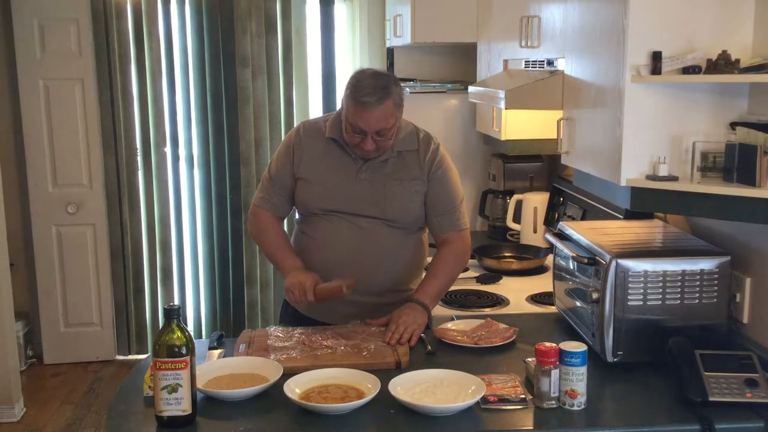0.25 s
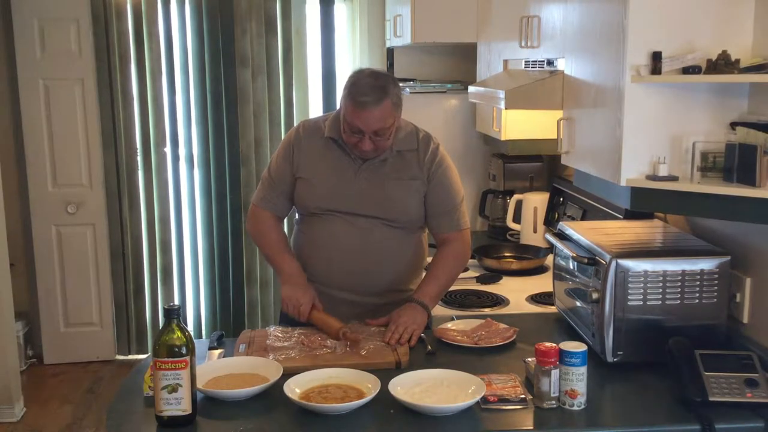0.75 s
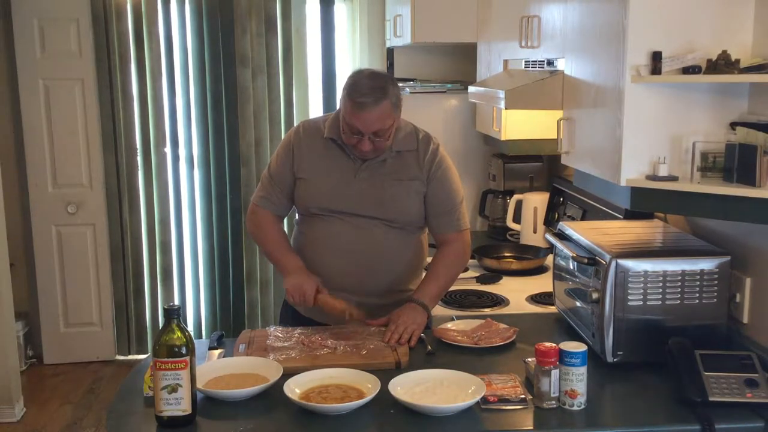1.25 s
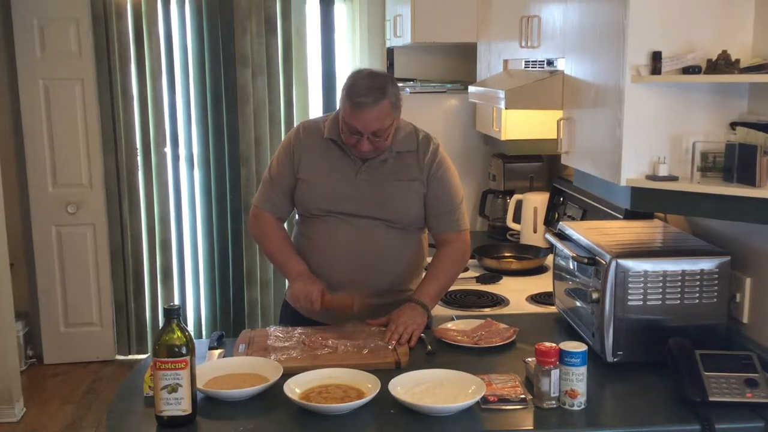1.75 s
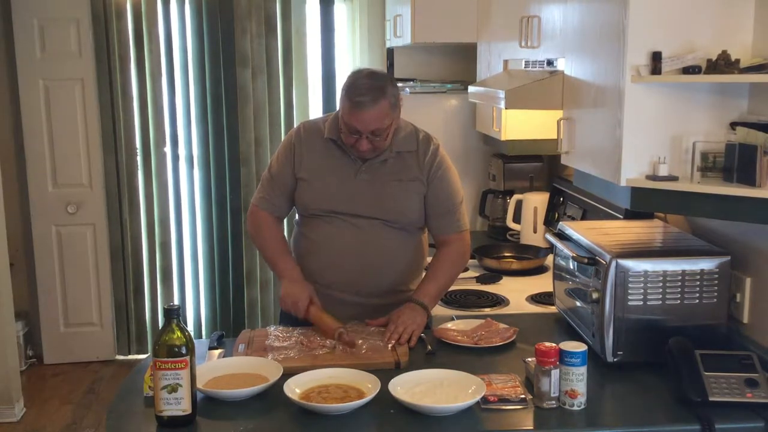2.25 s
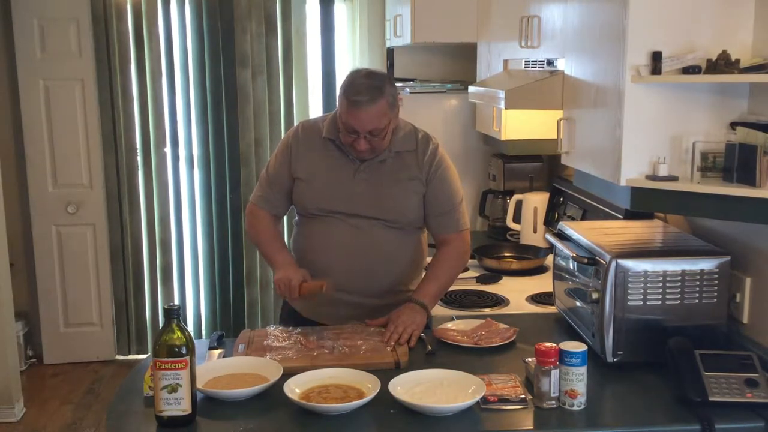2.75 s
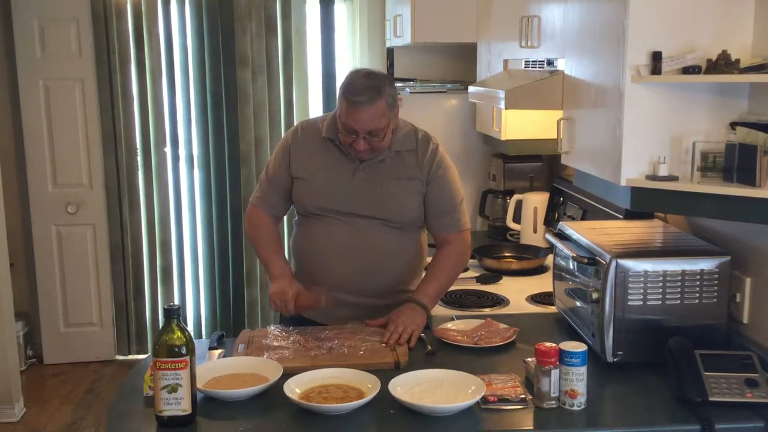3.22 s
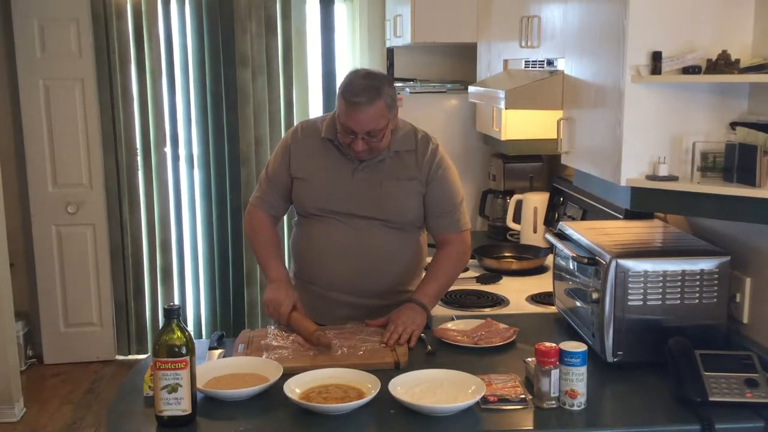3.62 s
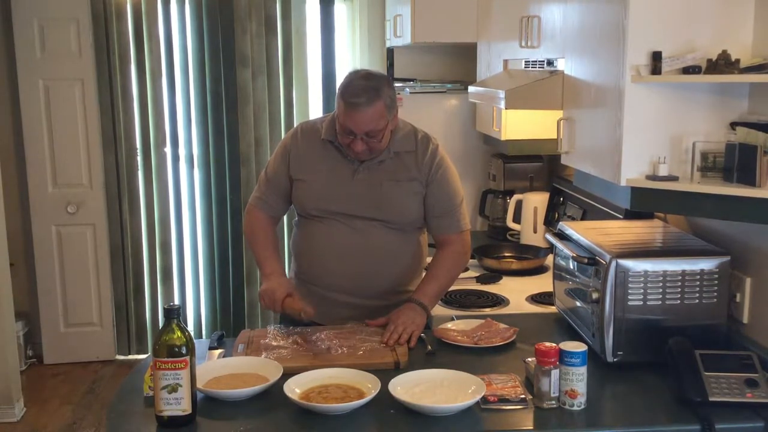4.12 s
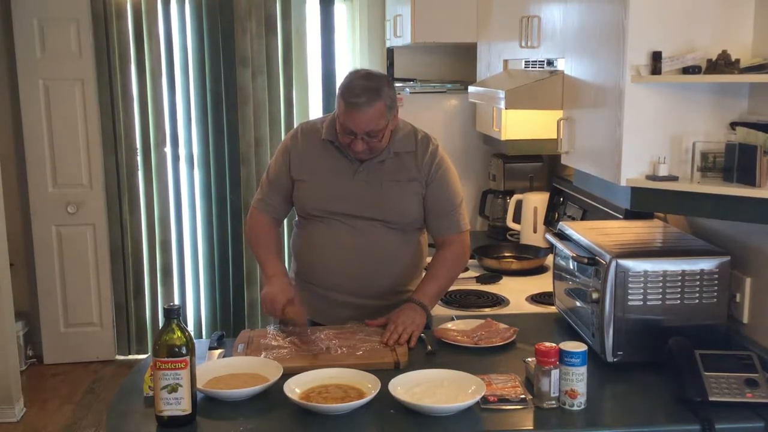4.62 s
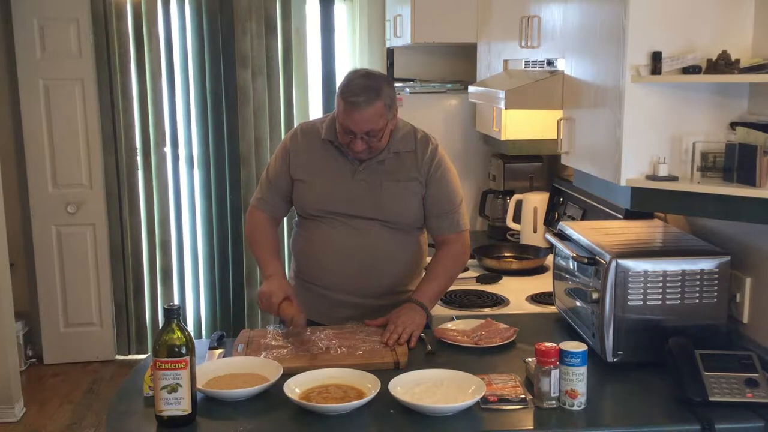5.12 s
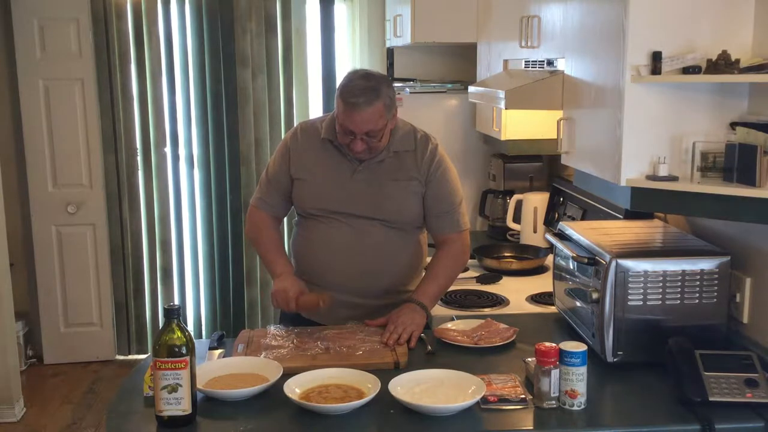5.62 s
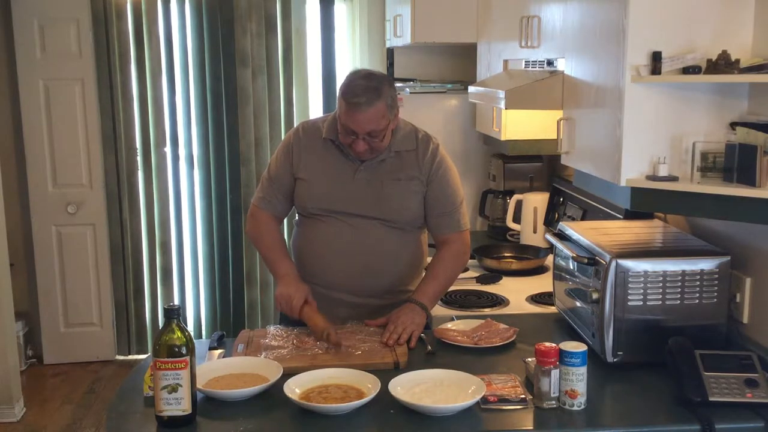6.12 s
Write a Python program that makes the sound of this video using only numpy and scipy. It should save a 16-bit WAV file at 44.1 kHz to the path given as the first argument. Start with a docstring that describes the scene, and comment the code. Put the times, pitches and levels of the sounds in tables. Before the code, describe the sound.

A wooden pin steadily beats film-covered chicken on a board, each wet slap landing with a woody knock and low counter thump, in a small kitchen.

```python
"""Wet slaps and wooden knocks, about three a second: a rolling pin beats filmed chicken on a board.
Each stroke smacks the film (swelling click noise), pops trapped air, squelches, then rustles (noise).
It thumps the counter (decaying sines with echoes); pin and board knock (noise bursts in resonances).
Force and flatness set most levels, random spectral patches the colour of film and wood.
Bowls ring faintly (wavering sines); a small hard kitchen adds diffuse tails and a steady hush."""
import sys
import numpy as np
from scipy import signal
from scipy.fft import rfft, irfft, next_fast_len
from scipy.io import wavfile
from scipy.ndimage import map_coordinates

SR = 44100
rng = np.random.default_rng(int(sys.argv[2]) if len(sys.argv) > 2 else 0)


def materialize(psi):
    """Save the field psi as 16-bit PCM at rate SR to the path in sys.argv[1].

    A 1-D psi becomes a single channel; in a 2-D psi each row is a channel.
    """
    bounded = np.clip(np.atleast_2d(psi).T, -1, 1)
    quanta = np.round(bounded * 32767).astype(np.int16)
    wavfile.write(sys.argv[1], SR, quanta)


N = 280917

# strokes of the pin: slap_s, squash_s (slap to knock), force_db, flatness_db, crack_db (over the knock)
STROKES = [(-0.16, 0.0061, 0, 1, -3), (0.189, 0.0051, 0.5, 4, -10), (0.534, 0.0097, 1.5, -0.5, -3),
           (0.906, 0.0082, -2, 1, -23), (1.253, 0.0042, 0.5, 3.5, -12.5), (1.596, 0.0064, -0.5, 1, -14.5),
           (1.951, 0.0053, -2.5, 1.5, -8), (2.306, 0.001787, -2.5, 5.5, -16),
           (2.677, 0.0095, -0.5, -2.5, -3), (3.056, 0.0083, -4, 2, -23), (3.426, 0.012, -6, -.5, -11),
           (3.775, .024, -10.5, -1, -9), (4.132, .0054, .5, -9, -3), (4.474, 0.027, -10, -3.5, -7),
           (4.812, 0.02, -8, -8, -14), (5.176, 0.0067, -1.5, -6, -42), (5.503, 0.011, -3, -2, -4),
           (5.836, 0.005, -7.5, 2.5, -17), (6.186, .0098, -1.5, 1, -5)]
# low modes of counter and room: mode_hz, relative_db, t60_s
COUNTER_MODES = [(53, -19, .22), (70.1, -7, .3), (77.1, -8, .28), (102.7, -8.4, .3), (109.2, 0, .3),
                 (197, -17, .3), (282, -17, .25)]
# nearby surfaces returning the thump: delay_s, gain
WALL_ECHOES = [(.0065, 1.2), (.0109, .9), (.0215, 1.16), (.0267, .55), (.0327, 1.2), (.0447, 1.2)]
# resonances of the board: mode_hz, width_hz, relative_db
BOARD_MODES = [(170.7, 49, -1), (205.8, 19.2, 7.5), (248, 10, 2.5), (280.6, 15.8, 3.5), (347, 28.7, -1.5),
               (404.6, 38, -3), (459.5, 78, -7)]
# high wooden ring of pin and board: mode_hz, width_hz, relative_db
RING_MODES = [(2123, 50, 6), (2489, 64, 3), (2627, 70, 6), (2798, 53, 8), (3084, 200, -3.5), (5290, 32, -6),
              (5590, 69, -11.5)]
# colour of the knock: freq_hz, relative_db
KNOCK_COLOUR = [(120, -33.5), (330, -9), (560, 1.5), (640, -1.5), (735, 4.5), (840, -4.5), (980, 1),
                (1200, 1.5), (1620, 1.5), (1900, -2), (3000, -9), (4200, -14.5), (6500, -34), (15000, -49)]
# colour of the wet film: freq_hz, relative_db
FILM_COLOUR = [(200, 21), (900, 6.2), (2700, 14.4), (4000, 10.1), (5600, 9), (6400, 6.5), (7400, 4.5),
               (8400, 8.3), (10200, 3.6), (13000, 6.7), (16000, 2)]
# colour of the room noise: freq_hz, relative_db
HUSH_COLOUR = [(25, -6), (70, -9), (150, -6.5), (500, -29.5), (1500, -18), (4000, -26), (8000, -37.5),
               (16000, -48.5)]
# decay of the kitchen: freq_hz, t60_s
KITCHEN_DECAY = [(100, 0.32), (300, 0.47), (1300, 0.56), (2800, 0.52), (5000, 0.51), (8500, 0.34),
                 (15000, 0.24)]
# long-ringing bowl modes: mode_hz, relative_db, t60_s
BOWL_MODES = [(2630, -5, .45), (2789, 0, .62), (2801, -5, .5), (3117, -10, .45), (3908, -11, .55),
              (5262, -16, .4)]
# high ring over the knock as the pin wanders across the meat: time_s, level_db
RING_LEVEL = [(0.2, -3), (1.25, -2), (1.95, -5), (2.3, -17.5), (3.3, -5.5), (4.15, -18), (4.8, -18.5),
              (5.6, 2), (6.2, -5.5)]
# struck place favours low or high board modes: time_s, tilt_db_per_octave
BOARD_TILT = [(0.2, 3.5), (0.55, 0), (1.5, 0), (2.3, -0.5), (3.45, 1), (4.45, 0.5), (4.9, 9), (5.5, 4.5),
              (6.2, -2.5)]
# answer of each part to a stroke: firm_stroke_db, db_per_force_db, db_per_flatness_db
SLAP_LAW = (-39, 0.84, 0.99)
THUMP_LAW = (-30, .36, 0.19)
BOARD_LAW = (-33, 0.67, 0.32)
KNOCK_LAW = (-30, 0.97, 0)
BOWL_LAW = (-46, 1, 0.43)
POP_LAW = (-48.5, 0.87, 1.48)

CUSHION_DB_PER_DB, USUAL_CRACK_DB = 0.11, -7.5
BAND_LIMIT_HZ = 15900
LIFE_S = np.arange(int(.7 * SR)) / SR  # time axis of one sound
GRID_HZ = np.fft.rfftfreq(2 * len(LIFE_S), 1 / SR)


def amp(db):
    """Decibels to gain."""
    return 10 ** (np.asarray(db) / 20)


def along(points, hz):
    """Read (Hz, value) points on a log-frequency axis."""
    point_hz, values = np.transpose(points)
    return np.interp(np.log(hz + 1), np.log(point_hz + 1), values)


def at(curve, s):
    """Value of an (s, value) curve at one moment."""
    return np.interp(s, *np.transpose(curve))


def norm(x):
    """Scale to energy 1."""
    return x / np.sqrt(np.sum(x ** 2) + 1e-20)


def add(track, s, db, sound):
    """Mix in a sound whose energy equals db held for 150 ms, cut at the track ends."""
    start = round(s * SR)
    sound = norm(sound)[max(-start, 0):]
    part = track[max(start, 0):][:len(sound)]
    part += amp(db) * np.sqrt(.15 * SR) * sound[:len(part)]


def level(law, force_db, flat_db):
    """Level in dB of one part of a stroke, linear in force and flatness."""
    base_db, per_force, per_flat = law
    return base_db + per_force * force_db + per_flat * flat_db


def cushioned(crack_db):
    """Decibels gained by boom, board and pop when the meat swallows the crack."""
    return CUSHION_DB_PER_DB * (USUAL_CRACK_DB - crack_db)


def colour(points):
    """Causal (minimum-phase) response with the gain of a (Hz, dB) list."""
    cepstrum = irfft(np.log(amp(along(points, GRID_HZ))))
    # fold onto positive time
    cepstrum[1:len(LIFE_S)] *= 2
    cepstrum[len(LIFE_S) + 1:] = 0
    return np.exp(rfft(cepstrum))


def resonances(modes):
    """Causal response of (Hz, width Hz, dB) modes, summed with alternating sign."""
    total = 0
    for k, (hz, width_hz, db) in enumerate(modes):
        damping = 1j * GRID_HZ * width_hz
        total = total + (-1) ** k * amp(db) * damping / (hz ** 2 - GRID_HZ ** 2 + damping)
    return total


def through(x, response):
    """Pass a short sound through a response."""
    return irfft(rfft(x, 2 * len(LIFE_S)) * response)[:len(LIFE_S)]


def decay(t60_s):
    """Exponential decay, 60 dB per t60_s."""
    return amp(-60 * LIFE_S / t60_s)


def swell(time_s):
    """Exponential rise towards 1."""
    return 1 - np.exp(-LIFE_S / time_s)


def burst(t60_s, attack_s):
    """Noise that swells quickly and dies."""
    return norm(rng.standard_normal(len(LIFE_S)) * decay(t60_s) * swell(attack_s))


def crinkle(grain_db, rate_hz=2000):
    """Noise clumped into tiny clicks by a random level."""
    clumps = map_coordinates(rng.standard_normal(4096), [LIFE_S * rate_hz], order=1, mode='mirror')
    return rng.standard_normal(len(LIFE_S)) * amp(grain_db * clumps)


def patches(width_hz, depth_db):
    """Random spectral peaks and dips: no two blows land on the same spot."""
    knots = rng.standard_normal(2048)
    return amp(depth_db * map_coordinates(knots, [GRID_HZ / width_hz], mode='mirror'))


def in_kitchen(contact, response, room_db, build_s):
    """Contact plus diffuse tail in the struck thing's colour; the tail dies fastest in the treble."""
    noise = rng.standard_normal(len(LIFE_S))
    hz, t, bands = signal.stft(noise, SR, nperseg=256)
    bands = bands * amp(-60 * t / along(KITCHEN_DECAY, hz)[:, None])
    tail = signal.istft(bands, SR, nperseg=256)[1][:len(LIFE_S)]
    tail *= swell(build_s)
    return norm(through(contact, response)) + amp(room_db) * norm(through(tail, response))


def hush(db=-65):
    """Faint steady room noise, shaped in frequency."""
    gain = amp(along(HUSH_COLOUR, np.fft.rfftfreq(N, 1 / SR)))
    noise = irfft(rfft(rng.standard_normal(N)) * gain, N)
    return amp(db) * noise / np.std(noise)


def waver(rate_hz=45):
    """Random smooth level of a mode, from wall reflections."""
    return 1 + map_coordinates(rng.standard_normal(64), [LIFE_S * rate_hz], mode='mirror')


def bowls(scatter_db=3, rise_s=0.012):
    """Each knock travels through the counter and excites the bowls' lightly damped modes."""
    out = np.zeros(N)
    for s, squash_s, force_db, flat_db, _ in STROKES:
        ring = 0
        for hz, mode_db, t60_s in BOWL_MODES:
            gain = amp(mode_db + rng.normal(0, scatter_db))
            ring = ring + gain * decay(t60_s) * waver() * np.sin(2 * np.pi * hz * LIFE_S)
        add(out, s + squash_s, level(BOWL_LAW, force_db, flat_db), ring * swell(rise_s))
    return out


def rustles(db=-55, lag_s=0.003, t60_s=0.046, top_hz=6500):
    """The film creases just after the meat bottoms out: decaying click noise."""
    out, film = np.zeros(N), colour(FILM_COLOUR) / (1 + (GRID_HZ / top_hz) ** 4)
    for s, squash_s, *_ in STROKES:
        creases = crinkle(grain_db=-2.5) * decay(t60_s)
        add(out, s + squash_s + lag_s, db, in_kitchen(creases, film, room_db=-8.5, build_s=0.0035))
    return out


def squelches(db=-50, top_hz=3200, rough_db=4):
    """Wet meat spreads under the pin: dull click noise for as long as the squash lasts."""
    out, flesh = np.zeros(N), colour(FILM_COLOUR) / (1 + (GRID_HZ / top_hz) ** 4)
    for s, squash_s, *_ in STROKES:
        press = swell(.002) / (1 + (LIFE_S / squash_s) ** 8)
        spreading = crinkle(grain_db=rough_db) * press
        add(out, s, db, in_kitchen(spreading, flesh, room_db=-2.5, build_s=0.005))
    return out


def pops(lag_s=.002, t60_s=0.015, bright_hz=7000, trapping_db_per_db=0.34):
    """Air trapped under a flat landing bursts out as short, bright click noise."""
    out, film = np.zeros(N), colour(FILM_COLOUR) * (1 + 1j * GRID_HZ / bright_hz)
    for s, _, force_db, flat_db, crack_db in STROKES:
        db = level(POP_LAW, force_db, flat_db) + cushioned(crack_db)
        # thick meat, which damps the wooden ring, traps more air
        db -= trapping_db_per_db * at(RING_LEVEL, s)
        add(out, s + lag_s, db, through(crinkle(grain_db=3) * decay(t60_s), film))
    return out


def thumps(lowest_hz=54, scatter_db=1.5, softness=0.41, dulling_db_per_octave_s=170, linger_db=-15):
    """The push shakes the counter's low modes; nearby surfaces send the boom back."""
    out = np.zeros(N)
    for s, squash_s, force_db, flat_db, crack_db in STROKES:
        db = level(THUMP_LAW, force_db, flat_db) + cushioned(crack_db)
        # a slow squash gives a deeper boom that swells more gently
        direct = 0
        for hz, mode_db, t60_s in COUNTER_MODES:
            dulling_db = dulling_db_per_octave_s * squash_s * np.log2(hz)
            gain = amp(mode_db + rng.normal(0, scatter_db) - dulling_db)
            direct = direct + gain * decay(t60_s) * np.sin(2 * np.pi * hz * LIFE_S)
        boom = direct.copy()
        for delay_s, gain in WALL_ECHOES:
            boom += gain * np.interp(LIFE_S - delay_s, LIFE_S, direct, left=0)
        add(out, s, db, boom * swell(softness * squash_s + 1e-4))
        # a little boom lingers in the room
        linger = through(burst(t60_s=0.91, attack_s=0.02), resonances([(86.6, 44, 0)]))
        add(out, s, db + linger_db, linger)
    # the slowest motion radiates poorly
    return signal.sosfilt(signal.butter(4, lowest_hz, 'hp', fs=SR, output='sos'), out)


def knocks(crack_rise_hz=2000, crack_limit_hz=4600, flex_share=.4, muffle_db=1.15):
    """The meat bottoms out: pin and board knock together and both ring."""
    out, ring = np.zeros(N), resonances(RING_MODES)
    # meat between pin and board muffles the knock a little
    wood = colour(KNOCK_COLOUR) * colour([(500, muffle_db), (2000, -muffle_db)])
    crack_tone = (1 + 1j * GRID_HZ / crack_rise_hz) / (1 + (GRID_HZ / crack_limit_hz) ** 4)
    for s, squash_s, force_db, flat_db, crack_db in STROKES:
        knock_s, knock_db = s + squash_s, level(KNOCK_LAW, force_db, flat_db)
        # each spot on the board favours its own range of modes
        spot = patches(width_hz=130, depth_db=1.5)
        chatter = burst(t60_s=0.077, attack_s=0.0013)
        knock = in_kitchen(chatter, wood * spot, room_db=5.5, build_s=0.0041)
        add(out, knock_s, knock_db, knock)
        high_ring = in_kitchen(chatter, ring * spot, room_db=-3.0, build_s=0.011)
        add(out, knock_s, knock_db + at(RING_LEVEL, s), high_ring)
        # thin meat: nearly wood on wood, and cracks
        snap = burst(t60_s=.022, attack_s=.0001)
        add(out, knock_s, knock_db + crack_db, through(snap, wood * spot * crack_tone))
        # the board already flexes while the meat gives way
        tilt = at(BOARD_TILT, s)
        board = resonances([(hz, width_hz, db + tilt * np.log2(hz)) for hz, width_hz, db in BOARD_MODES])
        flex = burst(t60_s=0.11, attack_s=0.0011)
        board_db = level(BOARD_LAW, force_db, flat_db) + cushioned(crack_db)
        bending = in_kitchen(flex, board * spot, room_db=5.0, build_s=0.0051)
        add(out, s + flex_share * squash_s, board_db, bending)
    return out


def slaps(lead_s=.004, peak_s=0.0076, half_s=0.0029, drawn_out=0.14):
    """The film smacks flat on the wet meat in a spray of tiny clicks."""
    out, film = np.zeros(N), colour(FILM_COLOUR)
    for s, squash_s, force_db, flat_db, _ in STROKES:
        # swells and fades as the contact spreads; slow-yielding thick meat draws it out
        smack = 1 / (1 + ((LIFE_S - peak_s) / (half_s + drawn_out * squash_s)) ** 4)
        spray = crinkle(grain_db=0.5, rate_hz=1400) * smack
        spot = patches(width_hz=318.4, depth_db=3.5)
        slap = in_kitchen(spray, film * spot, room_db=6, build_s=0.007)
        add(out, s - lead_s, level(SLAP_LAW, force_db, flat_db), slap)
    return out


def scene():
    """All sources at one microphone."""
    background = hush() + bowls()
    film_and_meat = rustles() + squelches() + pops() + slaps()
    wood_and_counter = thumps() + knocks()
    return (background + film_and_meat + wood_and_counter)[None]


def record(dry, low_cut_hz=28):
    """The camera drops the deepest bass and keeps nothing above its band limit."""
    dry = signal.sosfilt(signal.butter(2, low_cut_hz, 'hp', fs=SR, output='sos'), dry)
    size = next_fast_len(N + SR // 2)
    # 400 Hz wide edge centred on the limit
    passed = np.clip((BAND_LIMIT_HZ - np.fft.rfftfreq(size, 1 / SR)) / 400 + .5, 0, 1)
    return irfft(rfft(dry, size) * passed, size)[:, :N]


dry = scene()
out = record(dry)
materialize(out)
```